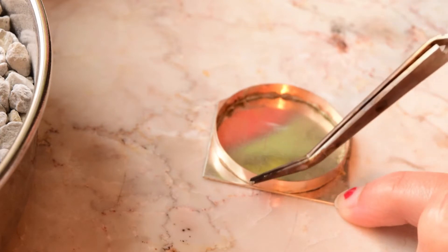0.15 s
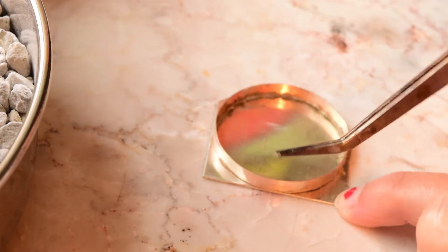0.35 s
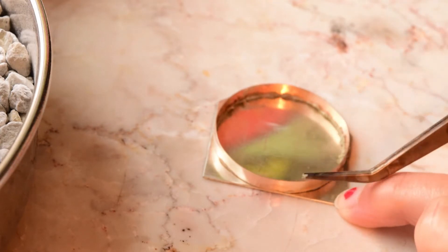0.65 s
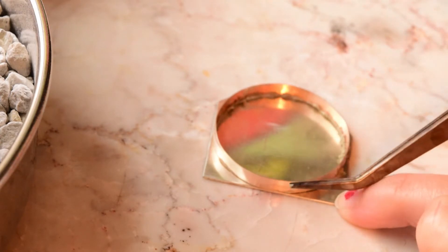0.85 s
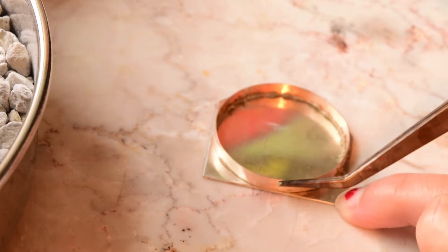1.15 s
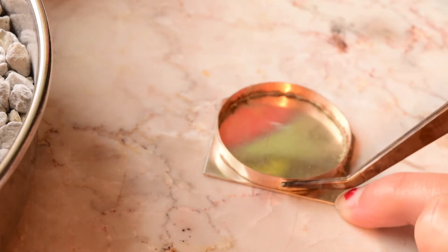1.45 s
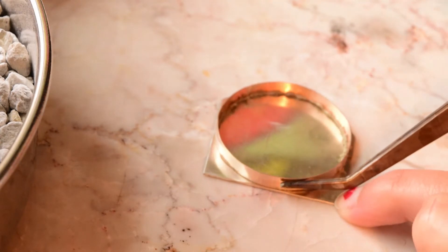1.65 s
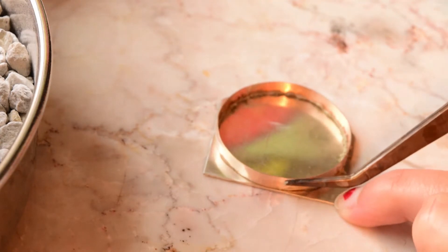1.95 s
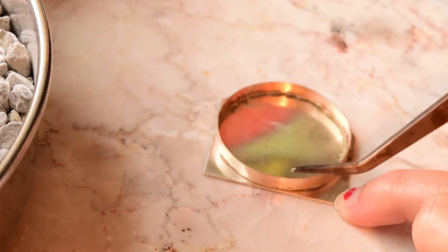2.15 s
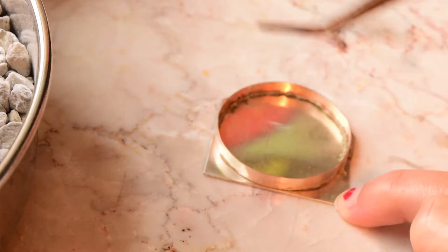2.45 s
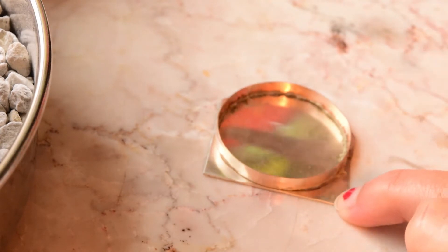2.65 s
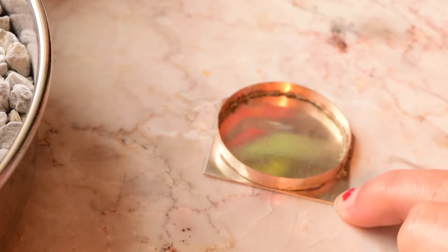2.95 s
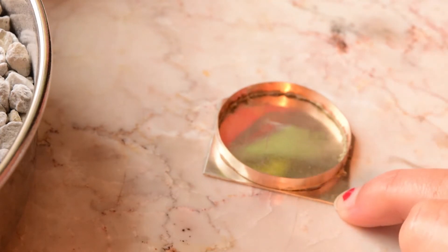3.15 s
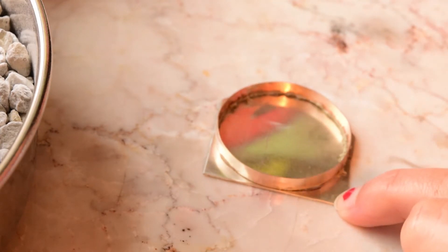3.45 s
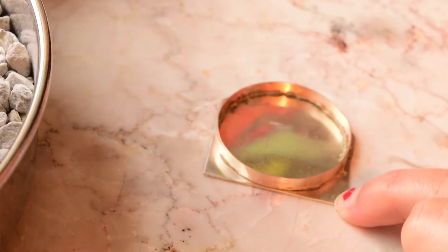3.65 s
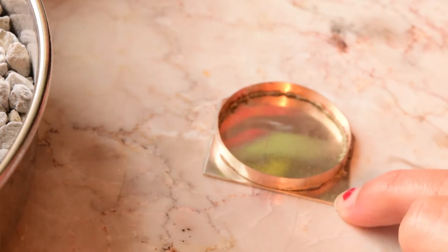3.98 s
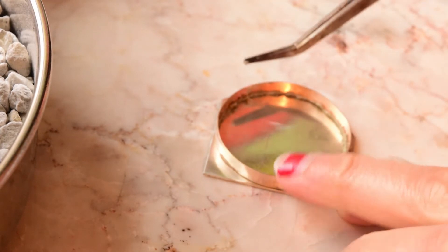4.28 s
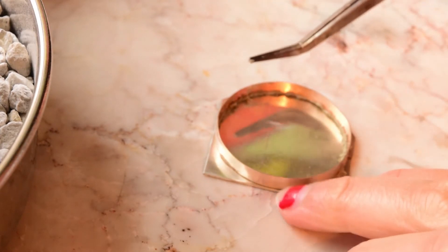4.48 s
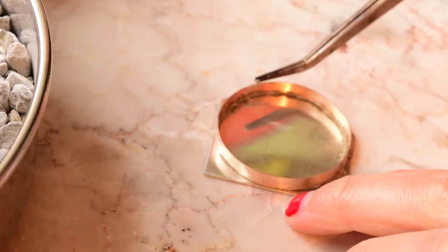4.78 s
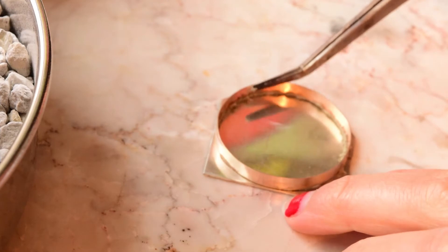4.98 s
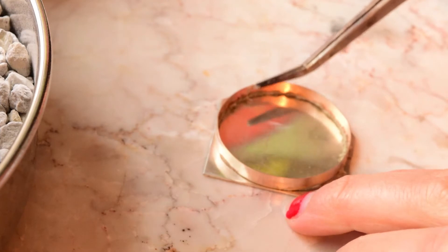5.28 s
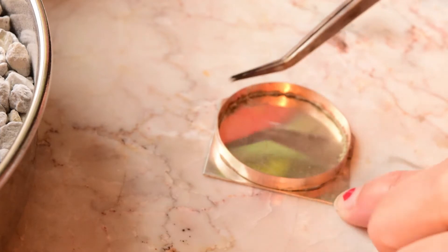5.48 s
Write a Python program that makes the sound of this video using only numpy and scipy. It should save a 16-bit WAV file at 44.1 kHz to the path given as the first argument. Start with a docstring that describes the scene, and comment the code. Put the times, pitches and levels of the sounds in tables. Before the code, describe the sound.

A small metal plate and ring knock and clatter on a hard bench, followed by light taps and faint tweezer ticks.

```python
"""Tweezers at a jeweller's bench

A small workshop, one microphone close to the bench. Steel tweezers nudge a brass ring and its metal
plate. Firm knocks rattle the plate and ring on in the bench and the room; light taps on something
hard die quickly. The tips tick on the rim, and the work slides a little and squeaks once, faintly.
Steady room noise lies underneath, and now and then the treble dips for an instant."""
import sys
import numpy as np
from scipy import signal
from scipy.fft import rfft, irfft
from scipy.io import wavfile

SR = 44100
rng = np.random.default_rng(int(sys.argv[2]) if len(sys.argv) > 2 else 0)


def put_to_file(sound):
    """Save the sound as 16-bit audio at rate SR, in the file named by the first command-line argument."""
    columns = np.atleast_2d(sound).T  # one column per channel
    safe = np.clip(columns, -1, 1)
    whole_steps = np.round(safe * 32767)
    wavfile.write(sys.argv[1], SR, whole_steps.astype(np.int16))


N = 247838
TIME = np.arange(N) / SR
HIT_SAMPLES = 18000
HIT_TIME, HIT_HZ = np.arange(HIT_SAMPLES) / SR, np.fft.rfftfreq(HIT_SAMPLES, 1 / SR)

# how long each register rings: frequency_hz, t60_factor
DECAY_BY_REGISTER = [(150, 2.44), (700, 1.24), (2500, 0.96), (6000, 1.06), (14000, 0.7)]


def knocks(modes, rebound_s=0.0075, rebound_hz=1630):
    """The plate cracks against the bench, then rebounds once with more clack and a longer tail."""
    # firm knocks: start_s, level_db, thud_db, clack_db, sheen_db, favoured_hz, rebound_db
    # (thud, clack, sheen and rebound are relative to the level)
    blows = [(0.3685, 12, -3, -9, -26.5, 460, 0), (0.4145, 11, -6.5, -16.5, -48, 1500, 0),
             (0.4255, 7.5, -3.5, -9.5, -27, 1350, -2.5), (0.8968, 28.5, -14, -14, -32, 560, -10.5),
             (0.9672, 17, -12, -8, -25.5, 620, -7.5), (1.0622, 6, -27, -11.5, -33, 704, -27),
             (1.0985, 8, -21.5, -11, -41, 1530, -2), (2.2086, 2.5, -5.5, -5, -30, 796, -22),
             (2.2530, 5.5, -9, -14.5, -28, 890, -6.5), (2.2845, 21, -3.5, -9.5, -28.5, 960, -1.5),
             (2.3140, 14.5, -3, -10, -35.5, 900, -2), (2.3440, 8, -17, -22, -39, 840, -24),
             (2.3700, 8, -7, -8.5, -40, 1440, -0.5), (2.4105, 13.5, -6.5, -11, -34, 890, -2),
             (2.4590, 5.5, -9, -15.5, -36, 1490, 0.5)]
    # spectrum of a knock: frequency_hz, level_db
    colour = [(40, -46), (120, -23.5), (230, -13.5), (380, -0.5), (520, -4), (700, 0), (1000, -4.5),
              (1600, -6), (2100, -3), (3000, -2), (4500, -4), (8000, -3), (11500, -17), (15500, -28)]
    rings = mode_rings(modes, t60_factor=0.79)
    out = np.zeros(N)
    for start_s, level_db, thud_db, clack_db, sheen_db, favoured_hz, rebound_db in blows:
        touch = landing(thud_db, clack_db, sheen_db, favoured_hz, favour_db=6)
        tail = reflections(base_t60_s=0.18, late_db=-32, burst_db=5.5)
        slap_db = -12.5 + 0.23 * level_db   # a harder knock slaps the plate flatter on the bench
        strike = contact(colour, touch, tail, rings, ring_db=2, slap_db=slap_db, crack_db=-2.5)
        add(out, start_s, from_db(level_db) * strike)

        touch = landing(thud_db + 0.5, clack_db + 3.5, sheen_db, rebound_hz, favour_db=4.5)
        tail = reflections(base_t60_s=0.27, late_db=-35, burst_db=-13)
        rebound = contact(colour, touch, tail, rings, ring_db=4.5, slap_db=-7, crack_db=-7.5)
        add(out, start_s + rebound_s, from_db(level_db + rebound_db) * rebound)
    return out


def taps(modes, sheen_re_clack_db=-26.5, halving_db=13):
    """Light, short taps on something hard at the bench."""
    # light taps: start_s, level_db, thud_db, clack_db, favoured_hz (thud and clack relative to level)
    blows = [(0.6749, 1.5, -11, -3.5, 4000), (2.8592, 14.5, -7.5, -2, 1090), (2.9486, 8, -2, -8, 990),
             (2.9635, 5.5, -6.5, -14, 760), (3.5993, 11.5, -9.5, -9.5, 1120), (3.6194, 8.5, -10, -16, 1300),
             (4.1320, -3, -11, -7, 2080), (4.6840, -2, -10, -3, 2000)]
    # spectrum of a tap: frequency_hz, level_db
    colour = [(40, -42), (120, -22), (230, -7.5), (380, 1.5), (650, -2), (1000, -7), (1400, -6), (2800, -7),
              (3900, -4.5), (4700, -13.5), (8000, -12), (11500, -29), (15500, -38)]
    rings = mode_rings(modes, t60_factor=0.65)
    out = np.zeros(N)
    for start_s, level_db, thud_db, clack_db, favoured_hz in blows:
        touch = landing(thud_db, clack_db, clack_db + sheen_re_clack_db, favoured_hz, favour_db=7)
        base_t60_s = 0.16 * 0.5 ** (level_db / halving_db)   # firmer taps die sooner
        tail = reflections(base_t60_s, late_db=-62, burst_db=3)
        tap = contact(colour, touch, tail, rings, ring_db=-4.5, slap_db=-10, crack_db=-10, crack_hz=8200)
        add(out, start_s, from_db(level_db) * tap)
    return out


def landing(thud_db, clack_db, sheen_db, favoured_hz, favour_db, width_octaves=0.37):
    """A blow's weight, hardness and the resonances it favours, in dB at each FFT bin."""
    touch = [(400, thud_db), (680, 0), (1100, 0), (2600, clack_db), (7500, sheen_db)]
    octaves_away = np.log2((HIT_HZ + 1) / favoured_hz)
    return at_hz(touch, HIT_HZ) + favour_db * np.exp(-(octaves_away / width_octaves) ** 2)


def contact(colour, landing_db, tail, rings, ring_db, slap_db, crack_db, crack_hz=2200):
    """A crack, a slap, reflections and ringing metal, all coloured by how and where the blow lands."""
    click = signal.unit_impulse(HIT_SAMPLES)
    crack = from_db(crack_db) * butter(click, crack_hz, "low", order=1)
    slap = from_db(slap_db) * butter(click, [610, 1420], "band")
    metal = from_db(ring_db) * (random_pushes(len(rings)) @ rings)   # each blow mixes the modes anew
    return coloured(crack + slap + tail + metal, at_hz(colour, HIT_HZ) + landing_db)


def work_modes(upper_count=44):
    """The main modes of plate and bench, and many weak, irregularly spaced upper modes of the metal."""
    # resonances of plate and bench: pitch_hz, level_db, base_t60_s
    main_modes = [(432, 3, 0.22), (459, 10, 0.27), (585, 7, 0.34), (669, 5, 0.34), (739, 7, 0.45),
                  (796, -1, 0.3), (868, -1, 0.5), (953, 4, 0.26), (1023, 1, 0.3), (1124, 1, 0.38),
                  (1205, 2, 0.24), (1405, 5, 0.32), (1470, 3, 0.3), (1585, 2, 0.3), (1627, 3, 0.26),
                  (1782, 3, 0.26), (2263, 4, 0.2), (2599, 3, 0.2), (2790, 5, 0.22), (3010, 3, 0.15),
                  (3190, 3, 0.16), (3660, 2, 0.18)]
    pitch_hz = np.linspace(2900, 14000, upper_count) + rng.uniform(-140, 140, upper_count)
    level_db = 1.5 + 3 * rng.standard_normal(upper_count)
    base_t60_s = 0.14 * at_hz(DECAY_BY_REGISTER, pitch_hz)
    return np.vstack([main_modes, np.column_stack([pitch_hz, level_db, base_t60_s])])


def mode_rings(modes, t60_factor):
    """Each mode rings as a dying cosine whose spectral peak stands at the mode's level."""
    pitch_hz, level_db, base_t60_s = np.transpose(modes)[:, :, None]
    fade = from_db(-60 * HIT_TIME / (base_t60_s * t60_factor))
    fade /= fade.sum(axis=1, keepdims=True)
    return 2 * from_db(level_db) * fade * np.cos(2 * np.pi * pitch_hz * HIT_TIME)


def tip_ticks(decay_cycles=620):
    """The fine steel tips touch so briefly that only a band of treble comes out."""
    # tweezer tips on the rim: start_s, level_db, lowest_hz, highest_hz
    ticks = [(0.1025, -37, 9500, 15000), (0.6745, -14, 3140, 4930), (3.826, -36, 6500, 14000),
             (4.9342, -30, 2800, 14500), (5.2000, -27, 2820, 14500)]
    out = np.zeros(N)
    for start_s, level_db, lowest_hz, highest_hz in ticks:
        tick = from_db(1) * reflections(base_t60_s=decay_cycles / highest_hz, late_db=-50)
        tick[0] += 1   # the direct click
        add(out, start_s, from_db(level_db) * butter(tick, [lowest_hz, highest_hz], "band", order=3))
    return out


def slides(slips_per_s=4000):
    """Sliding is a dense run of tiny slips: dull for the plate, a thin hiss for a light brush."""
    # the work slides on the bench: middle_s, half_length_s, level_db
    shifts = [(0.094, 0.028, -44), (0.195, 0.059, -46), (4.58, 0.097, -52), (4.712, 0.027, -38),
              (4.78, 0.027, -48.5)]
    # tweezers and fingertip brush along: middle_s, half_length_s, level_db
    brushes = [(4.13, 0.025, -70), (4.60, 0.052, -55.5)]
    # spectrum of the sliding plate: frequency_hz, level_db
    colour = [(80, -31), (300, -5.5), (700, 7.5), (1300, -3), (3000, -18), (6000, -72), (15000, -54)]
    slips = (rng.random(N) < slips_per_s / SR) * random_pushes(N)
    shuffle = shaped(slips, colour)
    hiss = rms_one(butter(slips, [2200, 3600], "band"))
    return swells(shifts) * shuffle + swells(brushes) * hiss


def squeak():
    """Metal rubbing on metal gives a thin, unsteady tone."""
    # a faint rub: middle_s, half_length_s, level_db
    rubs = [(3.72, 0.097, -73)]
    return swells(rubs) * noise_band(centre_hz=8800, width_hz=400)


def near_surfaces(x, echo_db=-32, lowest_hz=1300, count=6):
    """Hard things close by return the treble a few milliseconds late and ripple its spectrum."""
    out, treble = x.copy(), butter(x, lowest_hz, "high")
    for delay_s in np.linspace(0.0015, 0.009, count) + rng.uniform(-0.0006, 0.0006, count):
        add(out, delay_s, from_db(echo_db) * rng.choice([-1, 1]) * treble)
    return out


def reflections(base_t60_s, late_db, burst_db=0, build_s=0.0011, burst_t60_s=0.02, late_base_t60_s=0.81):
    """A burst from the struck part, dense reflections, then a faint room tail; flat, unit energy."""
    edges_hz = np.r_[0, np.geomspace(180, 16000, 16), SR / 2]
    burst = from_db(burst_db - 60 * HIT_TIME / burst_t60_s)
    rise = 1 - np.exp(-HIT_TIME / build_s)
    white = rfft(rng.standard_normal(HIT_SAMPLES))
    out = np.zeros(HIT_SAMPLES)
    for low, high in zip(edges_hz, edges_hz[1:]):
        age = HIT_TIME / at_hz(DECAY_BY_REGISTER, (low + high) / 2)
        dense = from_db(-60 * age / base_t60_s)
        late = from_db(late_db - 60 * age / late_base_t60_s)
        band = irfft(white * ((HIT_HZ >= low) & (HIT_HZ < high)))
        band *= rise * (burst + dense + late)
        energy_share = (high - low) / (SR / 2)
        out += band * np.sqrt(energy_share / np.sum(band ** 2))
    return out


def room_noise():
    """The workshop's room tone: steady moving air with a few soft resonances."""
    # spectrum of the air: frequency_hz, level_db
    colour = [(15, -71), (25, -32), (86, -21.5), (113, -9), (248, -8.5), (307, -3), (473, -2), (513, -5.5),
              (812, 0), (955, 4), (1090, -2), (1390, -1), (2150, -9), (7220, -24), (15800, -40)]
    # faint resonances: centre_hz, width_hz, level_db (relative to the air)
    resonances = [(317, 42, -21.5), (613, 65, -13), (1050, 430, -24), (2550, 22, -40)]
    # slow drift of the room's level: time_s, level_db
    drift = [(0, -49.5), (1.9, -51), (2.7, -49.5), (5.6, -49)]
    air = shaped(rng.standard_normal(N), colour)
    for centre_hz, width_hz, level_db in resonances:
        air += from_db(level_db) * noise_band(centre_hz, width_hz)
    return rms_one(air) * from_db(np.interp(TIME, *np.transpose(drift)))


def random_pushes(count, spread_db=3):
    """Pushes of random strength and sign."""
    return from_db(spread_db * rng.standard_normal(count)) * rng.choice([-1, 1], count)


def swells(table):
    """Smooth rises and falls of pressure."""
    return sum(from_db(db) * np.exp(-((TIME - middle_s) / half_s) ** 2) for middle_s, half_s, db in table)


def noise_band(centre_hz, width_hz):
    """Noise through one resonance; unit power."""
    edges_hz = [centre_hz - width_hz / 2, centre_hz + width_hz / 2]
    return rms_one(butter(rng.standard_normal(N), edges_hz, "band", order=1))


def coloured(x, level_db):
    """Minimum-phase filter with the given dB at each FFT bin."""
    cepstrum = irfft(np.log(from_db(level_db)), len(x))
    cepstrum[1:len(x) // 2] *= 2
    cepstrum[len(x) // 2 + 1:] = 0
    return irfft(rfft(x) * np.exp(rfft(cepstrum)), len(x))


def shaped(x, spectrum):
    """Give a steady sound a spectrum; unit power."""
    gain = from_db(at_hz(spectrum, np.fft.rfftfreq(N, 1 / SR)))
    return rms_one(irfft(rfft(x) * gain, N))


def butter(x, hz, kind, order=2):
    """Causal Butterworth filter."""
    return signal.sosfilt(signal.butter(order, hz, kind, fs=SR, output="sos"), x)


def at_hz(points, hz):
    """Read a table on a log-frequency axis."""
    known_hz, values = np.transpose(points)
    return np.interp(np.log(np.maximum(hz, 1)), np.log(known_hz), values)


def from_db(db):
    """Decibels to gain."""
    return 10 ** (np.asarray(db) / 20)


def rms_one(x):
    """Scale to unit power."""
    return x / np.sqrt(np.mean(x ** 2) + 1e-20)


def add(out, start_s, sound):
    """Mix a sound in at its start time."""
    start = round(start_s * SR)
    out[start:start + len(sound)] += sound[:N - start]


def scene():
    """The work on the bench, close up and in mono, over the noise of the room."""
    modes = work_modes()
    bench = knocks(modes) + taps(modes) + tip_ticks() + slides() + squeak()
    return near_surfaces(bench + room_noise())[None]


def record(dry):
    """The treble drops out now and then for an instant; the very top is cut throughout."""
    # moments when the treble dips: middle_s
    dips = [0.078, 1.166, 2.362, 2.405, 3.001, 4.155, 4.58, 5.133]
    dip_above_hz, dip_depth, dip_half_s = 4060, 0.85, 0.0095
    cutoff_hz = 15850
    dull = signal.sosfiltfilt(signal.butter(6, dip_above_hz, fs=SR, output="sos"), dry)
    dull_share = dip_depth * sum(np.exp(-((TIME - middle_s) / dip_half_s) ** 2) for middle_s in dips)
    top_cut = signal.ellip(10, 0.1, 70, cutoff_hz, fs=SR, output="sos")
    return signal.sosfilt(top_cut, dry + dull_share * (dull - dry))


dry = scene()
out = record(dry)
put_to_file(out)
```